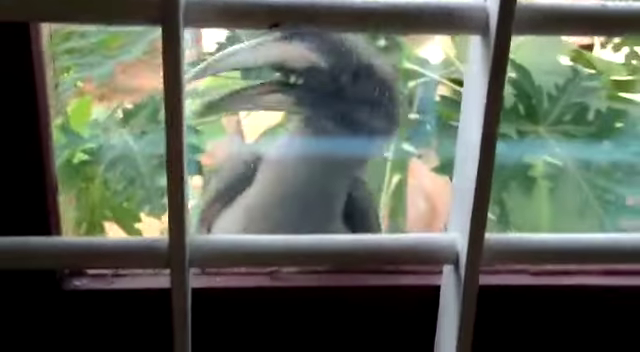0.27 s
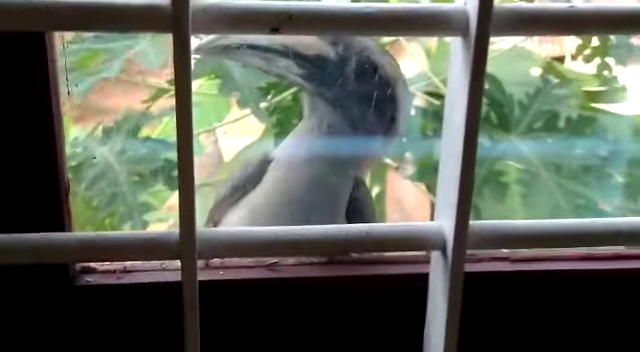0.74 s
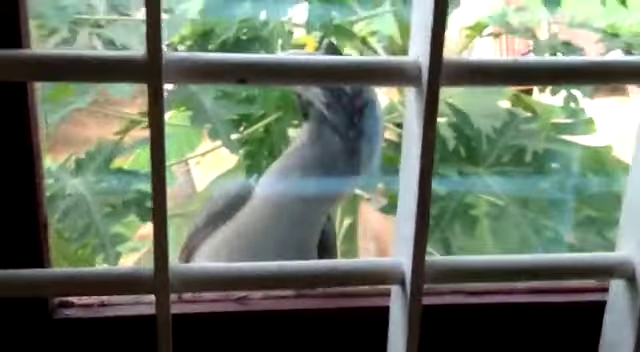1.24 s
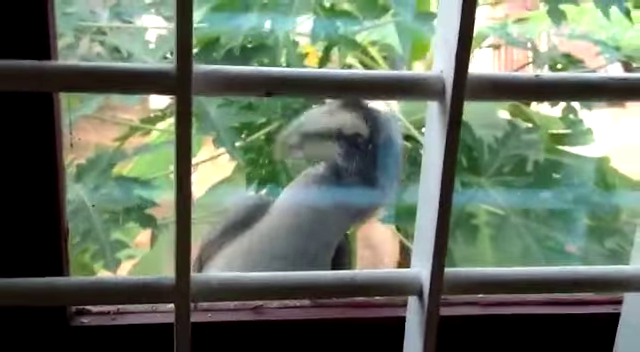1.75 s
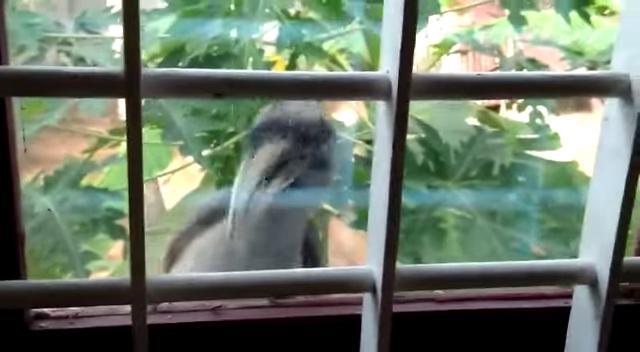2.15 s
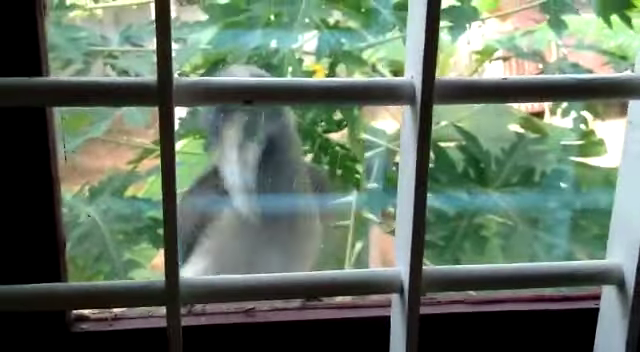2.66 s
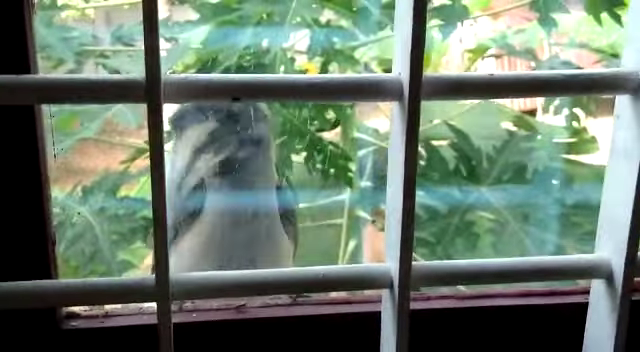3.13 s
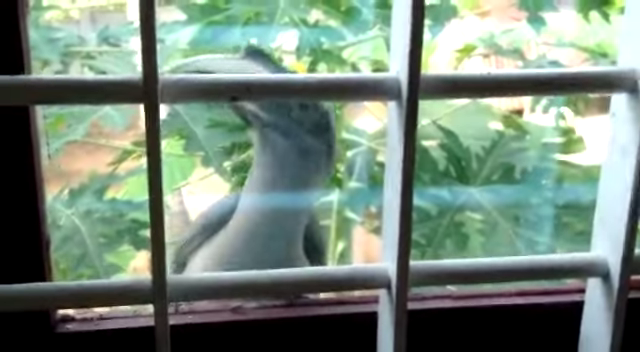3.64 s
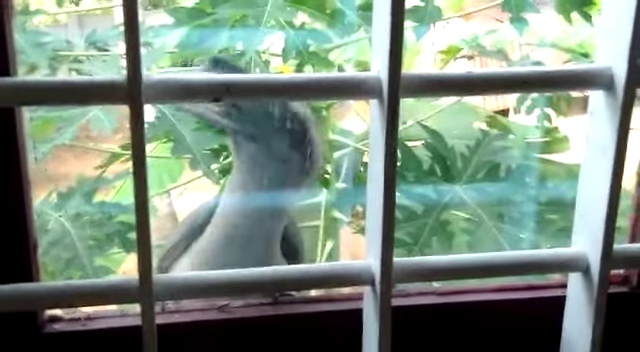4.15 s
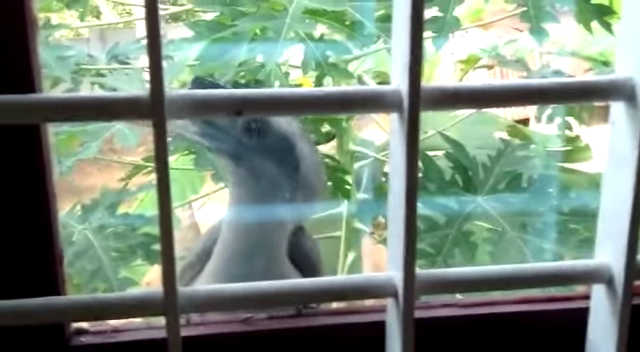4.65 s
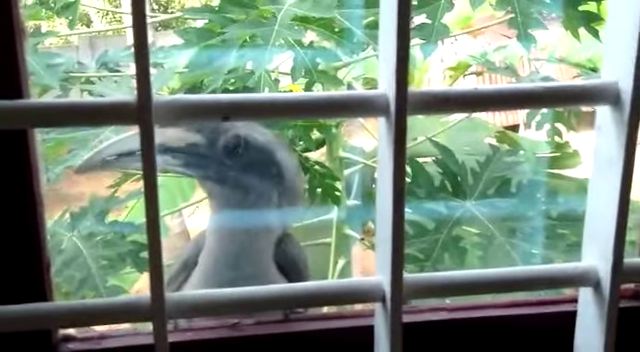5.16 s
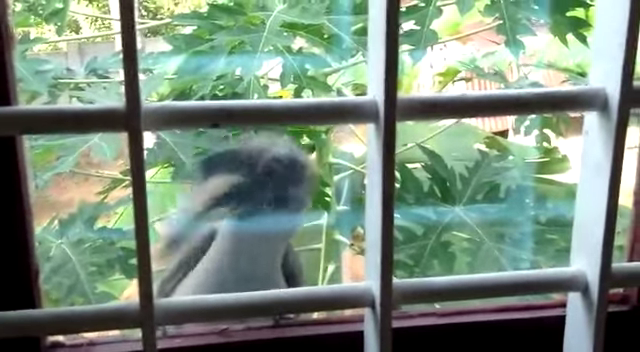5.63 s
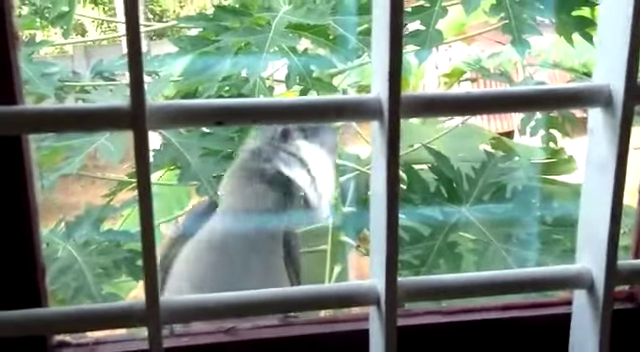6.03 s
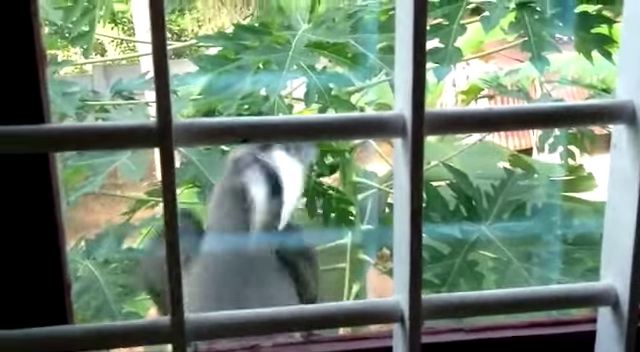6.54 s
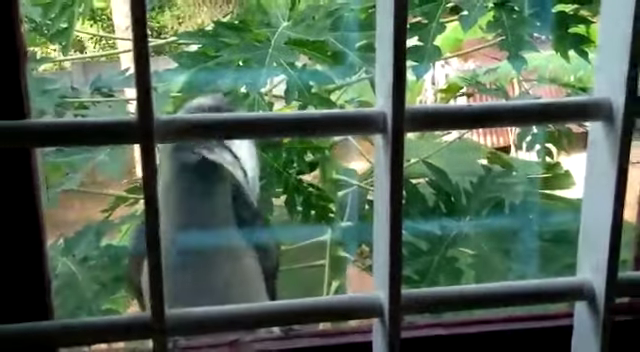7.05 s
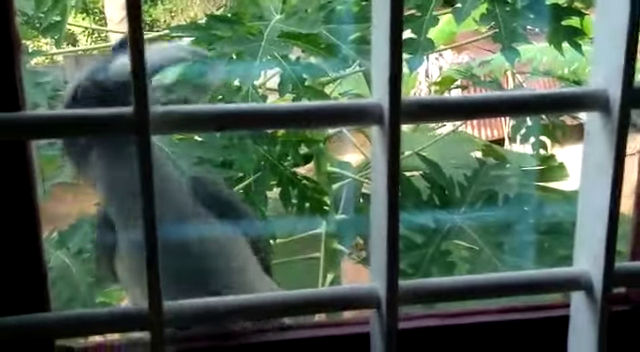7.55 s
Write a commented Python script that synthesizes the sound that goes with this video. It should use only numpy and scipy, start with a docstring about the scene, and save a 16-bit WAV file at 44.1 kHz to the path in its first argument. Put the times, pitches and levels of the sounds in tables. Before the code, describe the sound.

Inside a bare, reverberant room, a large bird raps its bill on a window pane. A dull tap at 0.1 s leads into knocks at 0.2, 0.4 and 0.7 s, the latter two hardest, each a short low thump with a bright slap and loose chatter in the frame, then a weaker tap at 1.1 s. Low glass tones and echo fade. Until 3.4 s there is mostly soft garden hush, a faint, very high cricket buzz in uneven chirps, and a dim far-off drone around 2-3 s. Muffled bumps cluster at 3.4-3.6 s; sharp rattling blows return at 4.4, 4.7 and 5.1 s. Light scrapes and crisp hollow bill clacks gather at 5.3-5.6 s. Very faint touches follow, then a soft thud at 6.26 s. One short falling bird whistle sounds at 6.8 s with the drone faintly returning; buzz and hush continue to about 8 s.

```python
"""A hornbill raps its bill on a window pane, heard from inside a bare, echoing room.
Each blow is a short push that thumps the glass and rings its low modes; when hard, it makes the pane slap
and chatter in its frame, as runs of tiny collisions. The bill also clacks lightly and rings hollow.
Outside, a bush cricket buzzes as pulsed noise through one resonance, a small bird calls once as a falling
whistle, and the garden is a soft hush of coloured noise with a faint, gliding far-off drone."""
import sys
import numpy as np
from scipy import signal
from scipy.fft import rfft, irfft
from scipy.io import wavfile
from scipy.ndimage import uniform_filter1d

SR = 44100
rng = np.random.default_rng(int(sys.argv[2]) if len(sys.argv) > 2 else 0)


def inscribe(sig):
    """Save sig as 16-bit PCM at rate SR to the path in sys.argv[1].

    A 1-D sig is mono; a 2-D sig holds one channel per row.
    Samples are clipped to [-1, 1] before scaling.
    """
    pcm = np.round(np.clip(np.atleast_2d(sig).T, -1, 1) * 32767)
    wavfile.write(sys.argv[1], SR, pcm.astype(np.int16))


N = 343520
TIME = np.arange(N) / SR
TAIL = TIME[:2 * SR]

# Blows on the pane. Each row: start in seconds, force in dB, contact brightness in Hz, hollow knock in dB,
# chatter in dB, chatter brightness in Hz, bending in dB, tick of the bill tip in dB.
PANE_BLOWS = [(0.124, -12.5, 830, 5, -30, 5000, -2.5, -20), (0.1972, -4, 2400, 9, -2.5, 7950, 2.5, 15.5),
              (0.3944, 1.5, 4530, -0.5, 8.5, 8300, -1.5, 7), (0.698, 0.5, 3700, 3.5, 6.5, 7700, 1.5, 15),
              (1.093, -15, 4960, 1, -11, 10000, -1, 9), (3.443, -9.5, 960, -3, -11, 6170, -16, 1),
              (3.4978, -27, 900, 0, -25, 5000, -14, -25), (3.535, -18, 880, 6.5, -6, 5000, -22, -22),
              (3.631, -26, 690, 1, -28, 5040, -2, -12), (4.4044, 1.5, 3480, -3, 4, 7200, -0.5, 10),
              (4.7004, .5, 4460, 1, 8, 22000, -1, 3), (5.0969, -0.5, 3220, -7.5, 1, 9000, 2.5, -4),
              (5.866, -26.5, 2200, 6, -16, 5000, -4, -24), (6.044, -24.5, 2200, 5, -20, 4987, 3.5, -27),
              (6.262, -7.5, 980, -6, -10.5, 9000, -2, 3.5)]
# Slaps of the shaken pane against its frame. Each row: start in seconds, level in dB.
FRAME_SLAPS = [(0.209, -10.5), (.4025, -1), (.41, 0), (0.441, -11.5), (0.7113, -0.5), (0.721, -7.5),
               (1.098, -16.5), (1.106, -20), (4.413, -21), (4.4214, -4), (4.444, -8.5), (4.71, -10),
               (4.7416, -5.5), (5.11, -15), (5.117, -15), (6.046, -34)]
# Bending modes of the pane. Each row: frequency in Hz, level in dB, t60 in seconds.
PANE_MODES = [(79.1, -36.5, 0.89), (111.3, -34.5, 0.56), (145.3, -28, 1.36), (184.6, -31.5, 3.53),
              (189, -43, 1.6), (204.6, -28.5, 0.76), (233.5, -29, 0.2), (275, -32, 1.28),
              (281.4, -34.5, 2.2), (355.5, -37.5, 1.2), (462, -39.5, 1.27), (561, -35, 0.8),
              (620, -30.5, 0.37), (636, -27, 0.28), (827, -37.5, 0.79), (919, -30, 0.14), (979, -32, 0.25),
              (1340, -35, 0.063), (1650, -28, 0.074), (1870, -41, 0.034)]
# Modes of the frame. Each row: frequency in Hz, level in dB, t60 in seconds.
FRAME_MODES = [(748, -25, 0.092), (1153, -20.5, 0.065), (1364, -14, 0.067), (1697, -26, 0.068),
               (1900, -28, 0.02), (2200, -38, 0.017), (3730, -23, 0.023)]
# Colour of the struck glass. Each row: frequency in Hz, gain in dB.
GLASS_COLOUR = [(62, -16), (85, -7), (150, 2), (290, 2), (430, 0.5), (650, -1), (1100, -4), (1400, -4),
                (2200, -3), (3700, -13), (5000, -13.5), (9000, -17.5), (15000, -46)]
# Each contact rings the upper modes at its own slightly shifted pitches (spread as a fraction of pitch).
PANE_DETUNE, FRAME_DETUNE = 0.0126, 0.039
# A firm blow is bright; a softer contact thumps and bends the pane less, by so many dB an octave.
FIRM_HZ, THUMP_DB_PER_OCTAVE, BEND_DB_PER_OCTAVE = 4640, 4.5, 6
LEAD_S = 0.005  # the thump's time axis starts this long before the blow


def pane(thump_db=-5.5, glass_db=-27, ring_db=-0.5, knock_db=-2.5, clink_db=0, slap_db=-1,
         tick_db=-32, tip_db=-20, lowest_hz=74):
    """Modal excitation: blows push and ring the plate, which then slaps and chatters against its frame."""
    push, force, bend, rings, tips = np.zeros((5, N))
    # where the bill lands decides how much the slow, the hollow and the quick modes take up
    slow = [mode for mode in PANE_MODES if mode[0] < 400]
    hollow = [mode for mode in PANE_MODES if 400 <= mode[0] < 700]
    quick = [mode for mode in PANE_MODES if 700 <= mode[0]]

    for s, db, bright_hz, hollow_db, _, _, bend_db, point_db in PANE_BLOWS:
        contact = undb(db) * touch(bright_hz)
        firmness = np.log2(bright_hz / FIRM_HZ)  # octaves
        add(push, s - LEAD_S, undb(db + THUMP_DB_PER_OCTAVE * firmness) * thump())
        add(force, s, contact)
        add(bend, s, undb(bend_db + BEND_DB_PER_OCTAVE * firmness) * contact)
        knock = strike(contact, hollow, PANE_DETUNE, build_s=0.0025)
        add(rings, s, undb(knock_db + hollow_db) * knock)
        clink = strike(contact, quick, PANE_DETUNE, build_s=0.00067)
        add(rings, s, undb(clink_db) * clink)
        # the tip also rings the highest frame mode
        tip = strike(touch(8000), FRAME_MODES[-1:], PANE_DETUNE, build_s=0.001)
        add(rings, s, undb(tip_db + point_db) * tip)
        add(tips, s, undb(point_db) * contacts(0.0034))

    for s, db in FRAME_SLAPS:
        slap = strike(touch(9000), FRAME_MODES, FRAME_DETUNE, build_s=0.0014)
        add(rings, s, undb(slap_db + db) * slap)

    hum = undb(ring_db) * through(bend, ring(slow, build_s=0.0096))
    glass = through(force, reverberant(GLASS_COLOUR, early_db=3, early_s=0.028, build_s=0.0018))
    # the tick of the tip arrives dry
    ticks = highpass(undb(tick_db) * tips, 4500)
    sound = hum + rings + undb(glass_db) * glass + chatter() + ticks
    # little sound leaves the pane below its lowest mode
    blow = undb(thump_db) * shape(push, lambda f: f ** 4 / (f ** 4 + lowest_hz ** 4))
    radiation = signal.cheby1(5, .5, lowest_hz, "high", fs=SR, output="sos")
    return blow + signal.sosfilt(radiation, sound)


def thump(width_s=0.00027, rebound_s=0.0029, rebound=0.79, rebound_width_s=0.00045,
          sag=0.23, sag_width_s=0.0022, lean=-0.039):
    """Pulse radiation: the pane first pushes and pulls the air; the bending wave returns from the frame."""
    t = TAIL[:SR // 20] - LEAD_S
    u = (t - width_s) / width_s
    bell = lambda width: np.exp(-((t - rebound_s) / width) ** 2 / 2)
    first = (lean - u) * np.exp((1 - u ** 2) / 2)
    returning = (rebound + sag) * bell(rebound_width_s)
    sagging = sag * bell(sag_width_s) * (t > 0)
    return first + returning - sagging


# Colour of the chatter in the frame. Each row: frequency in Hz, gain in dB.
CHATTER_COLOUR = [(400, -22), (1200, -4.5), (2000, -4), (2600, 1), (3700, 3.5), (4600, -1), (6300, -6.5),
                  (9000, -7), (12500, -15), (15000, -19)]
# The harder the blow, the longer the pane takes to swing back against its frame (s at a force of 0 dB).
SWING_BACK_S = .006


def chatter(room_db=-35, chatter_s=.0055, spit_db=-13, count=4):
    """Repeated impact: the pane swings back on several spots, each reaching the room by its own paths."""
    out = 0
    for _ in range(count):
        rattle = np.zeros(N)
        for s, db, _, _, loose_db, loose_hz, _, _ in PANE_BLOWS:
            run = signal.fftconvolve(contacts(chatter_s), touch(loose_hz))
            add(rattle, s + SWING_BACK_S * undb(db), undb(db + loose_db) * run)
        response = reverberant(CHATTER_COLOUR, early_db=3.5, early_s=0.0045, build_s=0.00015)
        spit = highpass(rattle, 4500)
        out = out + undb(room_db) * through(rattle, response) + undb(spit_db) * spit
    return out / np.sqrt(count)


# Light clacks and scrapes. Each row: start in seconds, level in dB, length in seconds,
# contact brightness in Hz.
BILL_CLACKS = [(4.356, -18, 0.0016, 1900), (5.292, -17.5, 0.0031, 4500), (5.408, -10, 0.02, 1800),
               (5.468, -12, .012, 3000), (5.5, -6, 0.017, 5460), (5.5271, 0, 0.0018, 11000),
               (5.531, 0, .003, 12000), (5.57, -7.5, .005, 9000), (5.582, -10, .005, 9000)]
# Colour of the clacking bill. Each row: frequency in Hz, gain in dB.
BILL_COLOUR = [(50, -38), (300, -6), (600, -10), (860, 5.5), (1150, -7), (1650, 1), (2000, -7), (2450, 3.5),
               (3200, -8), (3900, 5), (4500, 0), (6500, -1.5), (9000, -1), (12500, -6.5), (14600, -11)]
# Modes of the hollow bill. Each row: frequency in Hz, level in dB, t60 in seconds.
HOLLOW_BILL_MODES = [(835, -16, 0.7), (871, 12.5, 0.044), (1425, -4, .3), (1732, -6, 0.18),
                     (3892, -7, 0.055), (4100, -17, 0.3), (6500, -21, .3)]
SHARP_HZ = 11000  # only a clack this sharp rings the bill fully; a softer one rings it less


def bill(clack_db=-33, ring_db=-1, skid_db=18):
    """Cavity resonance and friction: the bill clacks, rings hollow and skids without bending the glass."""
    clicks, sharp, skids = np.zeros((3, N))
    for s, db, length_s, bright_hz in BILL_CLACKS:
        contact = undb(db) * touch(bright_hz)
        add(clicks, s, contact)
        add(sharp, s, contact * min(bright_hz / SHARP_HZ, 1))
        add(skids, s, signal.fftconvolve(contacts(length_s), contact))
    crack = through(clicks, reverberant(BILL_COLOUR, early_db=11.0, early_s=0.0057, build_s=0.0015))
    grains = highpass(skids, 1400)  # dry
    hollow = through(sharp, ring(HOLLOW_BILL_MODES, build_s=0.00076))
    return undb(clack_db) * (crack + undb(skid_db) * grains + undb(ring_db) * hollow)


# Chirps of the bush cricket. Each row: start in seconds, length in seconds, level in dB.
CRICKET_CHIRPS = [(0.093, 0.073, 0.5), (.18, 0.14, 2), (0.336, .2, 2), (.62, 0.21, -8), (1.03, .04, -12),
                  (1.25, .055, -5), (1.332, 0.061, -1), (1.424, .16, -1.5), (1.61, 0.054, -2),
                  (1.715, 0.039, -4), (1.785, 0.053, -6.5), (1.875, 0.059, -5), (1.98, 0.037, -3),
                  (2.083, 0.051, -4), (2.15, 0.12, 2), (2.358, .05, 0), (2.475, 0.14, .5),
                  (2.68, 0.11, -0.5), (2.79, 0.12, 0), (2.94, 0.051, -2.5), (3.05, 0.095, 0.5),
                  (3.174, .06, 2.5), (3.248, .12, -1), (3.42, .09, 0), (3.597, 0.12, 3.5),
                  (3.73, 0.16, 2.5), (3.907, 0.048, -.5), (3.99, 0.078, 3.5), (4.09, .16, -1.5),
                  (4.283, 0.26, 0.5), (4.798, 0.24, -8), (5.17, 0.18, -7), (5.401, 0.49, -3),
                  (6.005, .06, 2), (6.098, .04, -4), (6.177, .07, -1), (6.27, 0.13, -0.5),
                  (6.513, 0.098, -3), (6.61, 0.11, -1), (6.748, 0.15, -1.5), (6.95, 0.13, -1.5),
                  (7.271, 0.12, -1), (7.41, 0.11, -2.5), (7.544, .1, -4), (7.68, .05, -1), (7.742, .06, 1)]
BETWEEN_DB = -8.5  # between chirps the buzz only sinks


def cricket(level_db=-62.0, wing_hz=8980, width_hz=140, stroke_hz=237, stroke_decay=0.29, pan_db=-1):
    """Forced resonance: rapid wing strokes excite one high resonance, in uneven chirps."""
    chirps = sum(undb(db) * ((TIME > s) & (TIME < s + length_s)) for s, length_s, db in CRICKET_CHIRPS)
    gate = uniform_filter1d(np.maximum(chirps, undb(BETWEEN_DB)), SR // 50)
    phase = np.cumsum(stroke_hz * (1 + 0.015 * walk(20))) / SR % 1
    # the decay is a share of the stroke's period
    strokes = np.exp(-phase / stroke_decay) * rng.standard_normal(N)

    def wing(f):
        skirt = np.exp(-((f - wing_hz) / 2200) ** 2)
        return skirt / (1 + 1j * (f - wing_hz) / width_hz)

    buzz = unit(shape(strokes, wing))
    flicker_db = .8 * walk(25)
    side_db = np.array([[pan_db], [-pan_db]]) / 2
    return buzz * gate * undb(level_db + flicker_db + side_db)


# The small bird's call: a quick attack, then it fades as it falls.
CALL_S, CALL_LENGTH_S, CALL_ATTACK_S, CALL_RELEASE_S = 6.771, 0.091, 0.0082, 0.0079
CALL_HZ, CALL_SAG_HZ_PER_S = 3360, 3900
CALL_DB, CALL_FADE_DB_PER_S = -36.5, 95


def small_bird(octave_db=-17, direct_db=0, room_db=-1.0):
    """Harmonic whistle: one falling tone whose octave swells in mid-call, drawn out by the room."""
    age = np.clip(TIME - CALL_S, 0, CALL_LENGTH_S)
    pitch_hz = (CALL_HZ - CALL_SAG_HZ_PER_S * age) * (1 + 0.0028 * walk(250))
    phase = 2 * np.pi * np.cumsum(pitch_hz) / SR
    attack = np.minimum(age / CALL_ATTACK_S, 1)
    release = np.minimum((CALL_LENGTH_S - age) / CALL_RELEASE_S, 1)
    octave = undb(octave_db) * np.sin(np.pi * age / CALL_LENGTH_S) ** 2
    tone = np.sin(phase) + octave * np.sin(2 * phase)
    call = attack * release * undb(CALL_DB - CALL_FADE_DB_PER_S * age) * tone
    # a practically flat colour (Hz, dB)
    echo = reverberant([(100, 0.0061), (15000, 0)], early_db=9, early_s=0.05, build_s=0.025)
    echo = echo / np.sqrt(np.sum(echo[0] ** 2))
    return undb(direct_db) * call + undb(room_db) * through(call, echo)


# Colour of the garden hush. Each row: frequency in Hz, gain in dB.
GARDEN_COLOUR = [(25, -23), (55, -21), (85, -12.5), (130, -1), (190, -7), (300, -3.5), (600, -14),
                 (1000, -17.5), (1700, -23.5), (2700, -24.5), (4500, -30.5), (7000, -33.5), (11000, -33),
                 (15000, -41.5)]
# Swells of the far-off drone. Each row: loudest moment in seconds, half-length in seconds,
# pitch there in Hz, glide in Hz per second, width in Hz, level in dB.
DRONE_SWELLS = [(2.202, 0.66, 358.5, -39.5, 55, -52), (2.906, 0.32, 653.6, 4.5, 440, -53),
                (6.801, 0.31, 556, 89.5, 191, -50), (7.284, 0.069, 770, 284, 40, -50.5)]


def garden(hush_db=-51):
    """Broadband noise and a modulated carrier: a swelling hush, and a drone that comes, goes and glides."""
    out = noise(GARDEN_COLOUR, N) * undb(hush_db + .5 * walk(2.83))
    grain, flutter = rng.standard_normal(N), undb(1.2 * walk(34))
    for s, half_s, hz, glide_hz_per_s, width_hz, db in DRONE_SWELLS:
        t = TIME - s
        blur = unit(shape(grain, lambda f: np.exp(-(f / width_hz) ** 2)))
        swell = undb(db) * np.exp(-(t / half_s) ** 2)
        tone = np.sin(2 * np.pi * (hz + glide_hz_per_s * t / 2) * t)
        out = out + swell * flutter * blur * tone
    return out


def touch(bright_hz):
    """Contact force: a push of unit area; a softer contact lasts longer."""
    u = 2 * np.pi * bright_hz * TAIL[:SR // 100]
    return u * np.exp(-u) / np.sum(u * np.exp(-u))


def contacts(length_s, count=60):
    """Random impact process: a dying run of tiny collisions with unit energy."""
    when, size = rng.exponential(length_s, count), rng.standard_normal(count)
    run = np.zeros(len(TAIL))
    np.add.at(run, (when * SR).astype(int) % len(run), size * np.exp(-when / length_s / 2))
    return run / np.sqrt(np.sum(run ** 2))


def ring(modes, build_s, size=3 * SR):
    """Modal superposition: sines that build up and die away, the same in both channels."""
    t = TIME[None, :size]
    tones = sum(undb(db) * np.sin(2 * np.pi * hz * t) * np.exp(-np.log(1000) * t / t60)
                for hz, db, t60 in modes)
    return (1 - np.exp(-t / build_s)) * tones


MODE_SCATTER_DB = 4  # no two contacts land on the same spot, so each has its own mode strengths


def strike(contact, modes, detune, build_s):
    """Position-dependent excitation: one contact rings its own mix of a body's modes."""
    chance = rng.standard_normal((len(modes), 2))
    mix = [(hz * (1 + detune * a), db + MODE_SCATTER_DB * b, t60)
           for (hz, db, t60), (a, b) in zip(modes, chance)]
    return signal.fftconvolve(ring(mix, build_s, size=SR)[0], contact)


# Decay of the room. Each row: frequency in Hz, t60 in seconds.
ROOM_DECAY = [(80, 5.1), (200, 2.57), (450, 1.68), (1100, 1.145), (3500, 0.73), (7000, 0.55), (15000, 0.26)]


def reverberant(colour, early_db, early_s, build_s):
    """Diffuse decay: a body's dense, quickly dying ring runs into the room's tail, whose treble dies first."""
    hiss, out = noise(colour, len(TAIL)), 0
    for k, (_, t60) in enumerate(ROOM_DECAY):
        # overlapping bands whose shares sum to one
        share = [(hz, float(j == k)) for j, (hz, _) in enumerate(ROOM_DECAY)]
        out = out + shape(hiss, lambda f: along(share, f)) * np.exp(-np.log(1000) * TAIL / t60)
    early = undb(early_db) * hiss * np.exp(-TAIL / early_s)
    return (out + early) * (1 - np.exp(-(TAIL / build_s) ** 2))


# Likeness of the two channels before the phase swing.
# Each row: frequency in Hz, correlation as a fraction of one.
CHANNEL_LIKENESS = [(50, 0.031), (130, 0.0082), (380, 0.087), (700, 0.6), (1200, 0.98), (4900, 0.97),
                    (6500, 0.82), (9000, 0.042), (13000, 0.065)]
COMB_HZ = 2450  # spacing of the out-of-phase bands


def noise(colour, size):
    """Interchannel coherence: coloured noise whose channels swing in and out of phase in the upper mids."""
    mid, side = rng.standard_normal((2, size))

    def alike(f):
        swing = -np.cos(2 * np.pi * np.clip(f / COMB_HZ, .5, 2.5))
        return np.clip(along(CHANNEL_LIKENESS, f), -1, 1) * swing

    common = shape(mid, lambda f: np.sqrt(1 + alike(f)))
    opposed = shape(side, lambda f: np.sqrt(1 - alike(f)))
    pair = common + np.array([[1], [-1]]) * opposed
    return unit(shape(pair, lambda f: undb(along(colour, f))))


def walk(rate):
    """Low-passed randomness: slow chance, about rate changes a second, with a spread near 1."""
    k = int(SR / rate)
    steps = np.repeat(rng.standard_normal(N // k + 1), k)
    return unit(uniform_filter1d(uniform_filter1d(steps, k), k)[:N])


def through(x, response):
    """Convolution: pass a mono signal through a response of one or two channels."""
    return signal.fftconvolve(x[None], response, axes=1)[:, :N]


def add(out, s, sound):
    """Superposition: mix a sound in from time s."""
    i = max(int(s * SR), 0)
    out[..., i:i + sound.shape[-1]] += sound[..., :N - i]


def highpass(x, hz):
    """Second-order filtering: keep what lies above a cutoff."""
    return signal.sosfilt(signal.butter(2, hz, "high", fs=SR, output="sos"), x)


def shape(x, gain):
    """Spectral filtering: apply a gain that is a function of frequency."""
    size = x.shape[-1]
    return irfft(rfft(x) * gain(np.arange(size // 2 + 1) * SR / size), size)


def along(points, hz):
    """Logarithmic interpolation: read (Hz, value) points on a log-frequency axis."""
    f, value = np.transpose(points)
    return np.interp(np.log(hz + 1), np.log(f), value)


def unit(x):
    """Normalisation: scale to rms 1."""
    return x / np.sqrt(np.mean(x ** 2))


def undb(db):
    """Level law: decibels to amplitude gain."""
    return 10 ** (np.asarray(db) / 20)


def scene():
    """Superposition: the window in front, the garden behind it."""
    return pane() + bill() + cricket() + small_bird() + garden()


TOP_HZ = 15400  # upper edge of the pass band


def record(dry, lag_s=0.00042, split_hz=6125):
    """Interchannel difference: the left channel has the treble later and weaker; the top is cut."""
    # Each row: frequency in Hz, left minus right in dB.
    balance_db = [(450, -2.0), (1200, -2.0), (4400, -1.7), (8500, -5.0), (15000, -8.0)]
    delay = lambda f: np.exp(-2j * np.pi * np.maximum(f - split_hz, 0) * lag_s)
    left = shape(dry[0], lambda f: undb(along(balance_db, f) / 2) * delay(f))
    right = shape(dry[1], lambda f: undb(-along(balance_db, f) / 2))
    top_cut = signal.ellip(8, .2, 70, TOP_HZ, fs=SR, output="sos")
    return signal.sosfilt(top_cut, np.array([left, right]))


dry = scene()
out = record(dry)
inscribe(out)
```